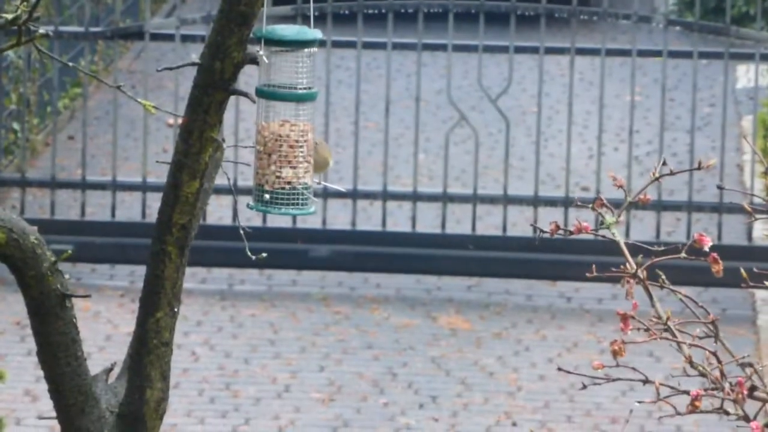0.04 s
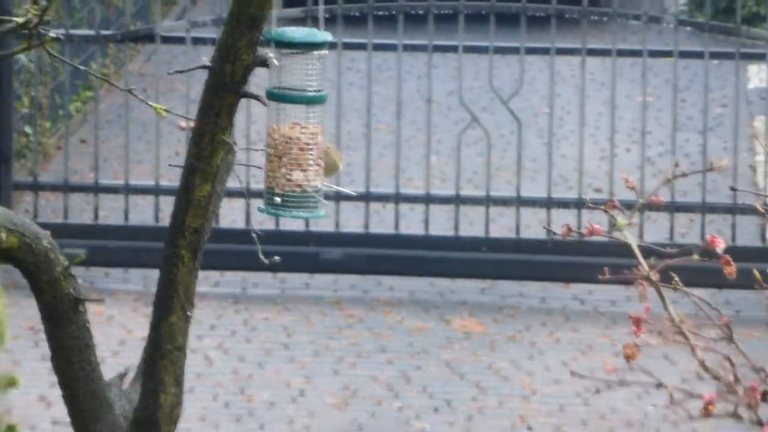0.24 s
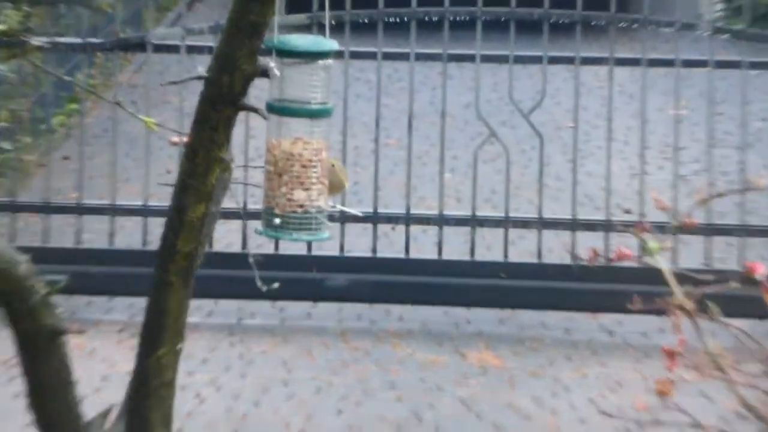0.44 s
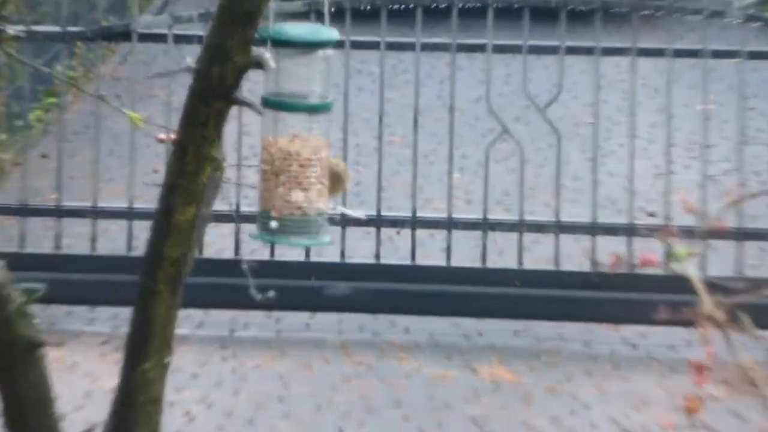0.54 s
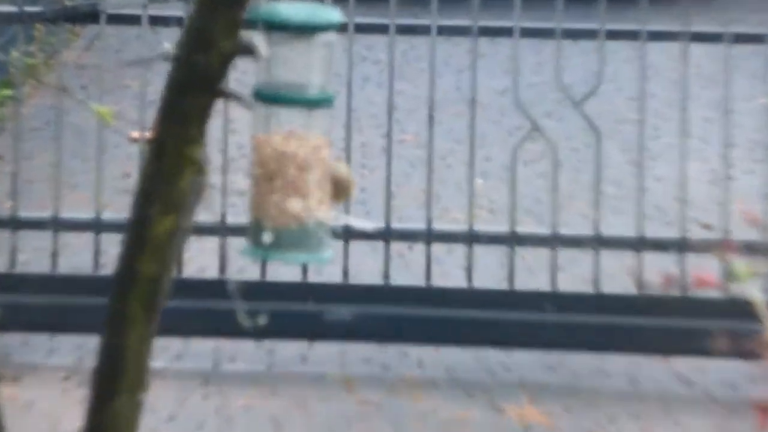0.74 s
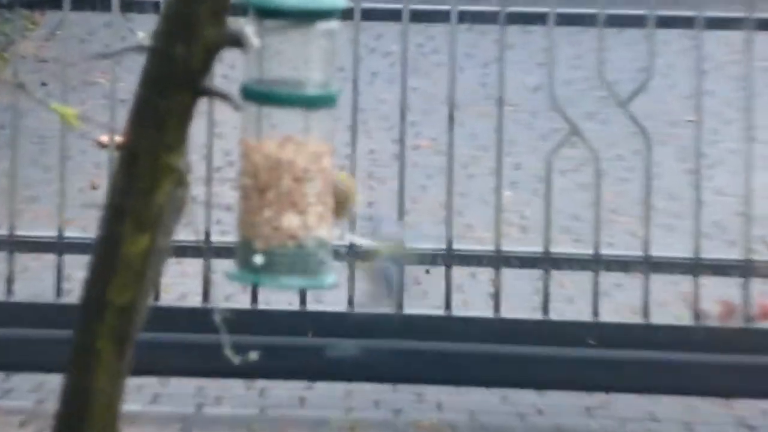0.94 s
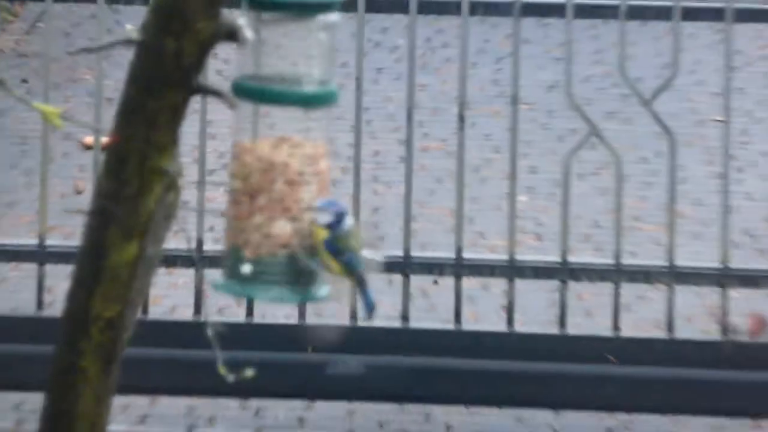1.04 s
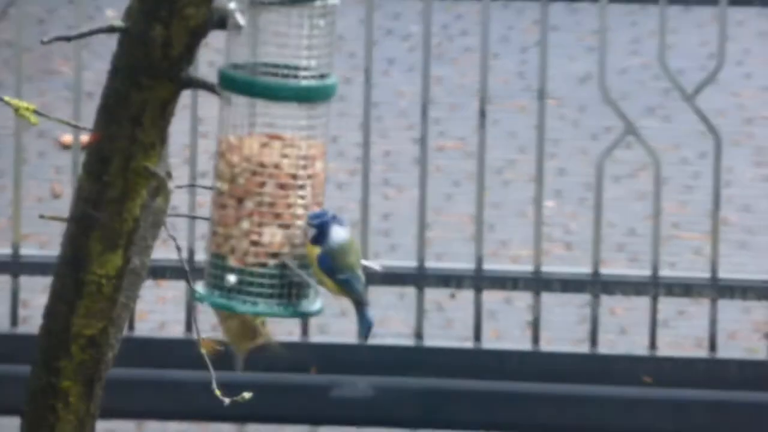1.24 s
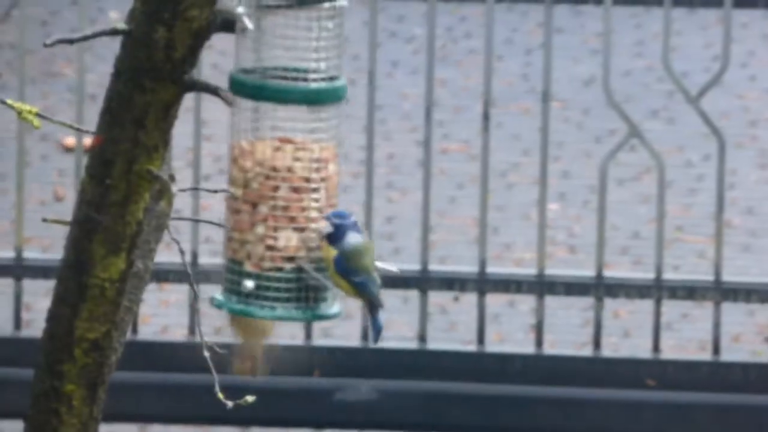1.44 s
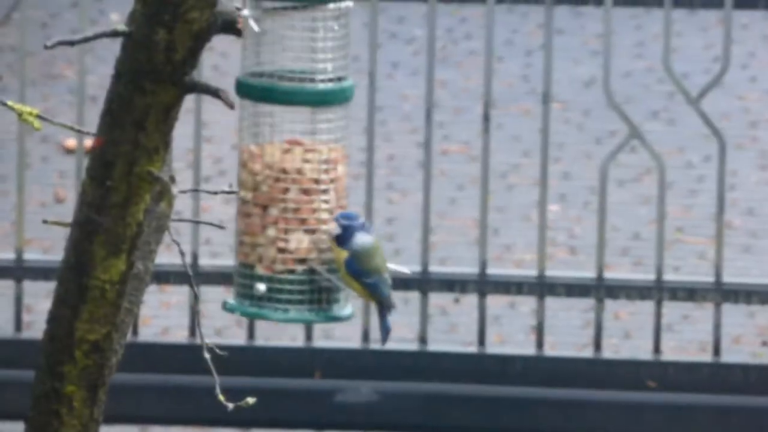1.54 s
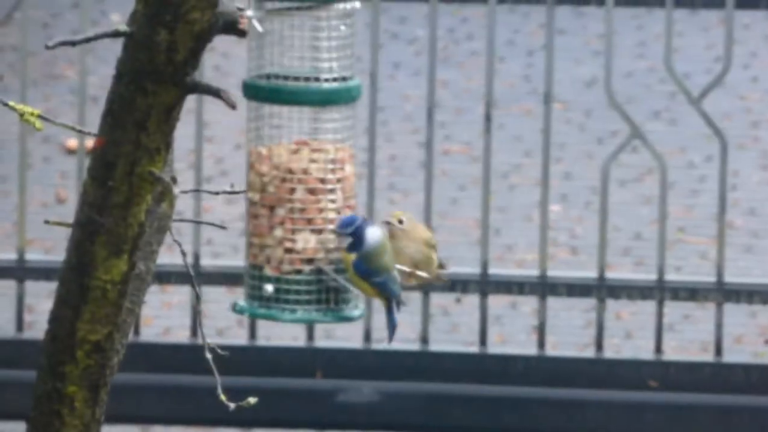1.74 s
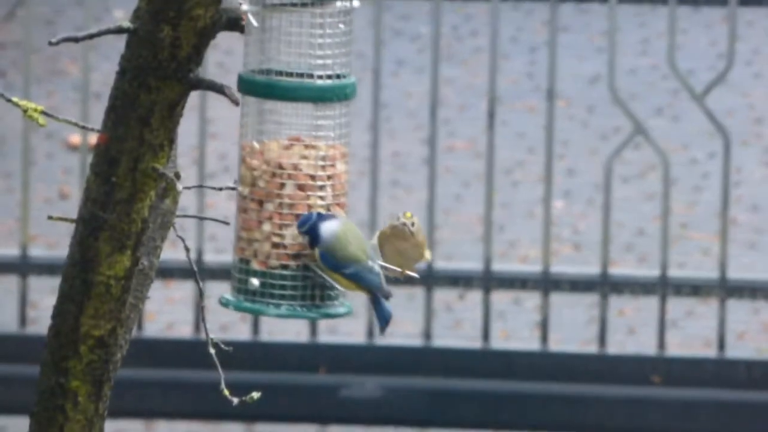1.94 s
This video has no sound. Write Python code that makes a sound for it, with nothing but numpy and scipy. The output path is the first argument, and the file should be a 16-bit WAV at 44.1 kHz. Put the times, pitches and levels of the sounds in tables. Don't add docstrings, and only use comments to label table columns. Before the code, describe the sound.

A camera's zoom motor whirs briefly up close, with sharp lever clicks before and near its end

```python
import sys
import numpy as np
from scipy import signal
from scipy.fft import rfft, irfft
from scipy.io import wavfile
from scipy.ndimage import uniform_filter1d

SR = 44100
rng = np.random.default_rng(int(sys.argv[2]) if len(sys.argv) > 2 else 0)


def wrap_up_sound(samples):
    columns = np.atleast_2d(samples).T
    tamed = np.clip(columns, -1, 1)
    steps = np.round(tamed * 32767).astype(np.int16)
    wavfile.write(sys.argv[1], SR, steps)


def gain_from_db(level_db):
    decades = np.asarray(level_db, float) / 20
    return 10 ** decades


N = 88200


def evened(x):
    return x / np.sqrt(np.mean(x ** 2) + 1e-20)


def add(mix, start_s, sound):
    part = mix[round(start_s * SR):][:len(sound)]
    part += sound[:len(part)]


def resonate(x, hz, width_hz):
    turn = np.exp(2j * np.pi * np.cumsum(hz * np.ones(len(x))) / SR)
    r = np.exp(-np.pi * width_hz / SR)
    return 2 * (turn * signal.lfilter([1 - r], [1, -r], x / turn + 1e-18)).real


def resonate_twice(x, hz, width_hz):
    return resonate(resonate(x, hz, width_hz), hz, width_hz)


def murmur(hz, width_hz):
    return evened(resonate_twice(rng.standard_normal(N), hz, width_hz))


def ring(modes, length_s):
    t = np.arange(0, length_s, 1 / SR)
    return sum(gain_from_db(db - 60 * t / t60_s) * np.sin(2 * np.pi * hz * t) for hz, db, t60_s in modes)


def drift(size):
    return evened(uniform_filter1d(uniform_filter1d(rng.standard_normal(N), size), size))


def motor():
    # hz, width_hz, level_db
    shell = [(1620, 250, 0.5), (1960, 800, -3), (2500, 1200, -13), (3250, 830, -2), (3800, 760, 1),
             (4600, 1080, -4), (5450, 1040, -7), (7900, 3300, -10.5), (8460, 520, -2), (10030, 530, -2.5),
             (10840, 1100, -8), (12960, 810, -9), (14800, 880, -20), (850, 900, -11)]
    # time_s, pitch_hz
    brush = [(.36, 324), (.44, 385.7), (.53, 384), (.62, 362), (.85, 373.6), (1.1, 372), (1.16, 358.7),
             (1.25, 384.6)]
    on_s, spin_up_s, off_s, stop_s = .352, .06, 1.256, .011
    segments = 6
    t = np.arange(N) / SR
    spin_up = np.clip((t - on_s) / spin_up_s, 0, 1) ** .5
    run = spin_up * np.clip((off_s - t) / stop_s + 1, 0, 1)

    brush_hz = np.interp(t, *np.transpose(brush))
    turn = 2 * np.pi * np.cumsum(brush_hz) / SR
    wobble = sum(np.cos(k * turn / segments + k * k) for k in (1, 2, 3))
    beat = 1 + 0.23 * np.cos(turn) + 0.067 * wobble
    grit = beat * gain_from_db(-2 * drift(size=12) + 0.34 * drift(size=500))

    whir = sum(gain_from_db(db) * shell_band(grit, hz, width_hz) for hz, width_hz, db in shell)
    tone = gain_from_db(-62) * wavering(brush_hz, wander_hz=9.9)
    rumble = gain_from_db(-62) * murmur(hz=240, width_hz=490)
    return run * (gain_from_db(-50.5) * evened(whir) + tone + rumble)


def shell_band(grit, hz, width_hz):
    hz = hz * (1 + .006 * drift(size=1500))
    band = resonate_twice(grit * rng.standard_normal(N), hz, width_hz)
    return gain_from_db(.7 * drift(size=900)) * band


def wavering(hz, wander_hz):
    phase = 2 * np.pi * np.cumsum(hz + wander_hz * drift(size=500)) / SR
    return np.sqrt(2) * np.sin(phase) * gain_from_db(2.2 * drift(size=900))


def gear_moan(length_s, first_hz, last_hz, db):
    u = np.linspace(0, 1, round(length_s * SR))
    hz = first_hz + (last_hz - first_hz) * u
    phase = 2 * np.pi * (np.cumsum(hz) / SR + rng.random())
    grain = evened(resonate(rng.standard_normal(len(u)), hz, width_hz=45))
    return gain_from_db(db + 4.5) * (np.sin(phase) + 0.19 * grain) * np.sin(np.pi * u) ** 0.54


def lever_snap(peak_db, push_ms, tilt_db):
    # hz, level_db, t60_s
    lever = [(1960, -23, .018), (2040, -6.5, 0.032), (2300, -9, 0.011), (2780, -23, .01), (2950, -4, 0.013),
             (3700, -9.5, 0.0094), (4400, 6, 0.0031), (5220, 8.5, 0.0032), (5600, -0.5, 0.003),
             (6700, -2.5, 0.0041), (8570, -5, 0.0053), (10200, -13, 0.0064), (13160, -30, .004),
             (14500, -33, .004)]
    u = np.arange(-40, 41) / SR * 1000 / max(push_ms, .02)
    push = np.exp(-4 * u ** 2) * np.cos(2 * np.pi * 3.7 * u * push_ms)
    modes = [(hz, db + tilt_db * np.log2(hz / 4500), t60_s) for hz, db, t60_s in lever]
    sound = np.convolve(ring(modes, .04), push)[30:]
    sound = signal.lfilter(*signal.butter(3, 1500, "high", fs=SR), sound)
    return gain_from_db(peak_db) * sound / abs(sound).max()


def spring_tick(spring_db, hollow_db, spring_hz):
    # hz, level_db, t60_s
    spring = [(4147, -4, 0.0035), (4600, 7.4, 0.00209), (5200, 1.5, 0.0018), (6300, -7.5, 0.0021)]
    # hz, level_db, t60_s
    spring_edge = [(8950, -23, 0.0025), (10700, -29, .002), (12800, -28, 0.0022), (14200, -25, 0.0031)]
    # hz, level_db, t60_s
    hollow = [(1978, -0.4, 0.013), (2340, -8, 0.004), (2800, -17, 0.01)]
    swell_s, length_s = .0007, .03
    swell = np.minimum(np.arange(0, length_s, 1 / SR) / swell_s, 1) ** 2
    scale = spring_hz / spring[1][0]
    tuned = [(hz * scale, db, t60_s) for hz, db, t60_s in spring]
    bright = swell * ring(tuned + spring_edge, length_s)
    return gain_from_db(spring_db) * bright / abs(bright).max() + gain_from_db(hollow_db) * swell * ring(hollow, length_s)


def knock(db, hz, t60_s):
    sound = ring([(hz, 0, t60_s), (hz * 1.29, -11, t60_s * .5)], t60_s * 1.2)
    sound = sound * np.minimum(np.arange(len(sound)) / 25, 1)
    sound = np.pad(sound, (0, 600))
    return -gain_from_db(db) * signal.lfilter(*signal.butter(2, 60, "high", fs=SR), sound)


def finger_rub(length_s, db, hz, rise):
    slips_per_s, width_hz = 8200, 3300
    u = np.linspace(0, 1, round(length_s * SR))
    jerk, chance = rng.standard_normal((2, len(u)))
    slips = jerk * (.4 + (abs(chance) < slips_per_s / SR * 1.25))
    slips = slips * gain_from_db(1.6 * drift(size=70)[:len(u)])
    hz = hz * (1 + .08 * drift(size=250)[:len(u)])

    body = evened(resonate(resonate_twice(slips, hz, width_hz), hz, 2 * width_hz))
    air = evened(resonate(resonate(slips, 1900, 3900), 2980, 3900))
    body = body + gain_from_db(-3) * air + gain_from_db(-50) * evened(slips)
    rise = np.clip(rise, .03, .95)
    stroke = np.sin(np.pi / 2 * np.minimum(u / rise, (1 - u) / (1 - rise))) ** 0.98
    return gain_from_db(db) * body * stroke


def clink():
    # hz, level_db, t60_s
    metal = [(1483, 0.1, 1.5), (1590, -1, 1.2), (1650, -9, .4)]
    length_s = .12
    shake = rng.standard_normal(700) * np.hanning(700)
    held = ring(metal, length_s) * np.linspace(1, 0, round(length_s * SR)) ** 0.53
    return gain_from_db(-62) * evened(np.convolve(held, shake))


def yard():
    # hz, density_db
    hiss_curve = [(15, -49), (25, -39), (122, -5), (198, -5), (330, -8.5), (664, -12.5), (1200, -15),
                  (2910, -20), (15400, -32.5)]
    # hz, width_hz, level_db
    hum = [(47.3, 31, -75), (96, 44, -69.5), (125, 40, -79), (195.2, 6, -67), (397.4, 16.5, -69.5)]
    hz = np.fft.rfftfreq(N, 1 / SR)
    curve_hz, curve_db = np.transpose(hiss_curve)
    shape = gain_from_db(np.interp(np.log(hz + 1), np.log(curve_hz), curve_db))
    hiss = evened(irfft(rfft(rng.standard_normal(N)) * shape, N))
    hiss = gain_from_db(-56 + 1.1 * drift(size=4000)) * hiss
    return hiss + sum(gain_from_db(db) * murmur(f, width_hz) for f, width_hz, db in hum)


def scene():
    # start_s, peak_db, push_ms, tilt_db_per_octave
    snaps = [
        (.2019, -5.5, 0.02, 1),
        (0.29, -55, 0.13, 5.5),
    ]
    # start_s, spring_peak_db, hollow_db, spring_hz
    ticks = [(.0272, -40, -63, 5000), (.0572, -52, -46, 4030), (.1366, -39, -43, 4900),
             (.2894, -60, -31, 4660), (1.0534, -49, -30, 4600), (1.0542, -21.5, -23, 4670),
             (1.0853, -32, -50, 4600), (1.0861, -30, -31.5, 3670), (1.0878, -33, -52, 4750),
             (1.1226, -43.5, -38, 4630), (1.1244, -11, -22.5, 4800), (1.1275, -34, -41, 4200),
             (1.1543, -62, -37.5, 4520), (1.1852, -60, -32.5, 4530), (1.6272, -42, -55, 3930)]
    # start_s, length_s, first_hz, last_hz, level_db
    moans = [(.41, 0.096, 187.6, 149.5, -60), (.515, 0.052, 262, 268, -56.5), (.555, 0.047, 199, 170, -58),
             (.583, .07, 278, 185, -54.5), (.655, 0.07, 185, 245, -56.5), (.705, .045, 226, 165, -60),
             (.752, 0.06, 271, 242, -54.5), (.8, .12, 256, 228, -54), (.915, 0.044, 300.1, 300, -52),
             (.953, 0.039, 243, 230, -55.5), (.98, .045, 336, 343, -54.5), (1.015, 0.05, 250, 268, -56),
             (1.04, 0.053, 107, 99, -56.5), (1.05, .035, 222, 207, -56.5), (1.085, 0.043, 265, 245, -56.5),
             (1.115, .045, 153, 179.6, -60), (1.15, 0.0696, 213.5, 293, -53),
             (1.215, 0.046, 175, 215, -55.5)]
    # start_s, peak_db, pitch_hz, t60_s
    knocks = [(.002, -34, 660, 0.0054), (.0563, -30.5, 230, 0.0063), (.1368, -37, 1670, 0.0089),
              (.137, -34.5, 750, 0.0071), (.2893, -36, 465, 0.046), (.2897, -43, 2420, 0.012),
              (.2935, -48, 516, .03), (.2905, -48, 800, 0.022), (.2898, -35.5, 1710, .012),
              (.2945, -38, 1890, 0.017), (.301, -42, 640, .02), (.301, -51, 196, 0.056),
              (.303, -45, 1500, 0.012), (.3592, -30, 1180, 0.0058), (.3596, -31.5, 2280, 0.0074),
              (.3608, -40, 810, 0.031), (.3608, -35.5, 520, 0.026), (.361, -41, 2020, .022),
              (.36, -41.5, 685, 0.013), (.3612, -41, 1500, 0.02), (.3603, -37.5, 175, 0.04),
              (1.254, -44.5, 462, 0.047), (1.2928, -39, 246, 0.0083), (1.2955, -43, 1620, 0.018),
              (1.3272, -34, 400, 0.004), (1.607, -46, 1580, .03), (1.613, -49.5, 1960, 0.033),
              (1.628, -47, 2910, .025)]
    # start_s, length_s, level_db, centre_hz,
    # rise_share
    rubs = [(.0, 0.061, -60, 1650, .05), (.013, 0.034, -51.5, 4540, 0.41), (.056, 0.036, -48.5, 4450, 0.11),
            (.07, 0.046, -56, 4600, 0.4), (.092, 0.026, -49.5, 5160, 0.27),
            (.104, 0.042, -48.5, 4500, 0.32), (.265, 0.075, -59.5, 3900, 0.29),
            (.272, 0.052, -59.5, 9200, 0.31), (.14, 0.091, -61, 1500, 0.13),
            (.2026, 0.0052, -38, 3580, 0.081), (1.618, 0.022, -62, 5500, 0.31),
            (1.056, 0.022, -51, 4300, 0.37), (1.086, 0.0068, -41, 3800, 0.06),
            (1.1015, 0.01, -44.5, 4100, 0.18), (1.113, 0.011, -39.5, 4600, 1),
            (1.126, 0.021, -51, 3540, 0.13)]
    mix = motor() + yard()
    sources = ((snaps, lever_snap), (ticks, spring_tick), (moans, gear_moan), (knocks, knock), (rubs, finger_rub))
    for rows, source in sources:
        for start_s, *settings in rows:
            add(mix, start_s, source(*settings))
    add(mix, 1.602, clink())
    return np.array([mix, mix])


def split(x):
    # hz, gain_db
    apart = [(60, -12), (240, -13.5), (950, -7), (3770, -6), (15000, -1)]
    # start_s, end_s, share_of_bands
    stretches = [(0, .022, .95), (.165, .185, .5), (.39, .435, .92), (.482, .52, .85), (.548, .58, .4),
                 (.668, .76, .7), (.79, .825, .2), (.908, 1.02, .7), (1.328, 1.35, .4), (1.52, 1.71, .4),
                 (1.79, 2, .45)]
    hz, t, z = signal.stft(x, SR, nperseg=1024, noverlap=768)
    share = sum(part * ((t >= start_s) & (t <= end_s)) for start_s, end_s, part in stretches)
    band = (9 * np.log2(1 + hz / 1500)).astype(int)
    block = np.arange(len(t)) // 4
    keep = rng.random((len(t), len(hz)))[block][:, band].T < share

    apart_hz, apart_db = np.transpose(apart)
    gain = gain_from_db(-2 + np.interp(np.log(hz + 1), np.log(apart_hz), apart_db))
    z = keep * z * np.exp(2j * np.pi * rng.random(z.shape)) * gain[:, None]
    other = signal.istft(z, SR, nperseg=1024, noverlap=768)[1][:N]
    return x + np.array([other, -other])


def lowpass(x, edge_hz):
    return signal.oaconvolve(x, signal.firwin(801, edge_hz, window=("kaiser", 9), fs=SR), "same")


def top_cut(x):
    return signal.sosfilt(signal.butter(12, 16820, fs=SR, output="sos"), x)


def record(dry):
    # hz, width_hz, depth
    port = [(11850, 190, 0.6), (14000, 240, 0.5), (9580, 100, 0.54)]
    # start_s, end_s, edge_hz
    openings = [
        (.198, .205, 16700),
        (1.049, 1.059, 16600),
        (1.121, 1.129, 15850),
    ]
    x, t = dry[0], np.arange(N) / SR
    for hz, width_hz, depth in port:
        x = x - depth * resonate(x, hz, width_hz)
    cut = lowpass(x, 15480)
    heard = cut.copy()
    for start_s, end_s, edge_hz in openings:
        gate = uniform_filter1d(1. * (t > start_s) * (t < end_s), size=150)
        heard += gate * gain_from_db(-5) * (lowpass(x, edge_hz) - cut)
    return top_cut(split(heard))


dry = scene()
out = record(dry)
wrap_up_sound(out)
```